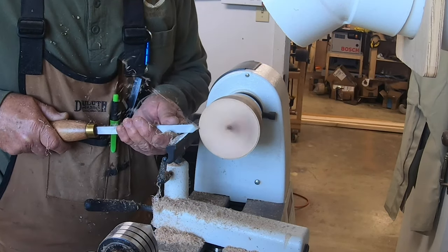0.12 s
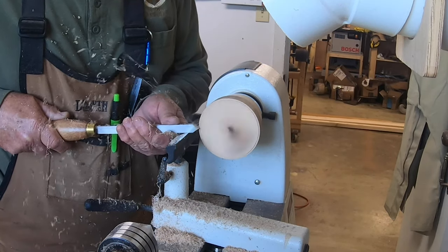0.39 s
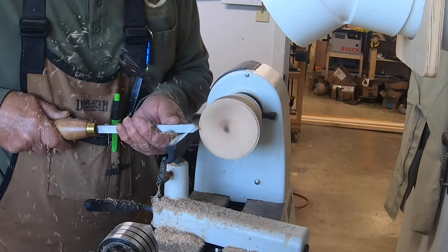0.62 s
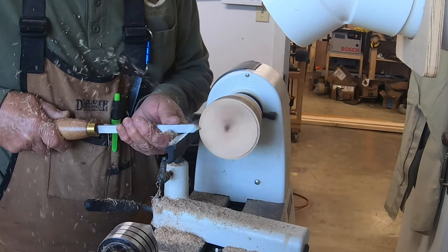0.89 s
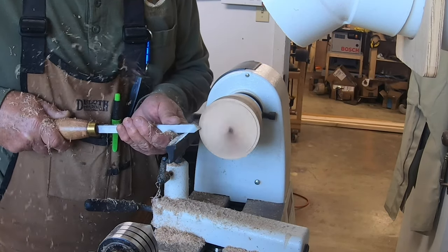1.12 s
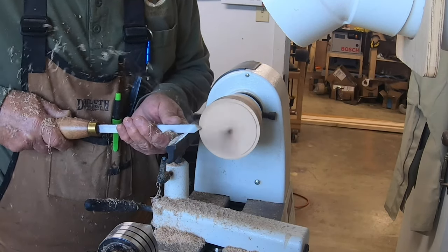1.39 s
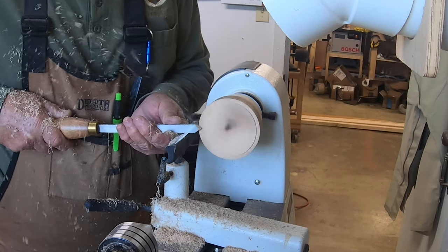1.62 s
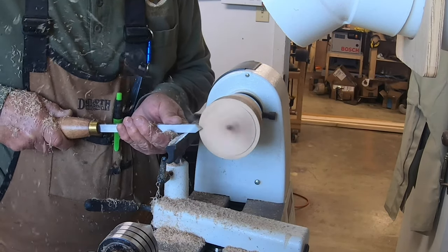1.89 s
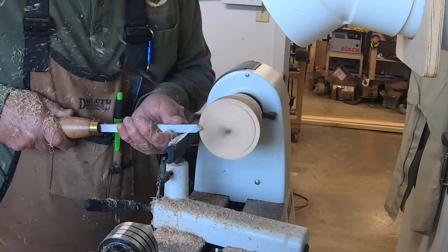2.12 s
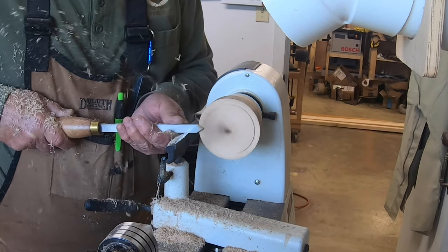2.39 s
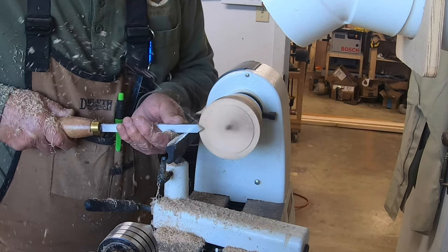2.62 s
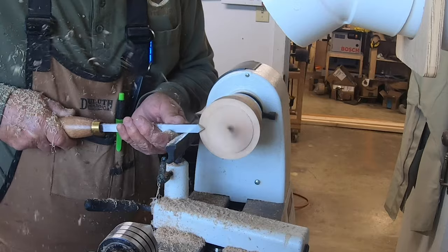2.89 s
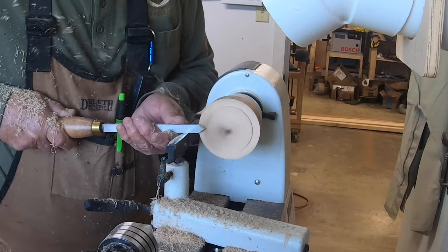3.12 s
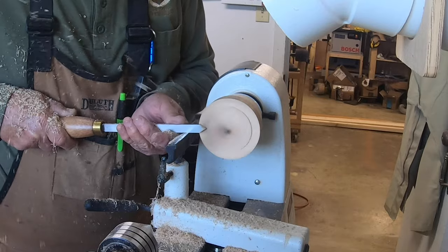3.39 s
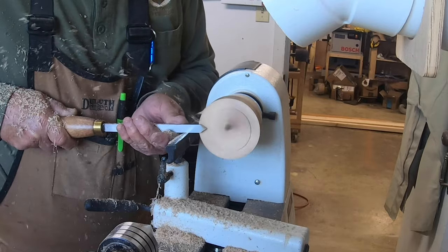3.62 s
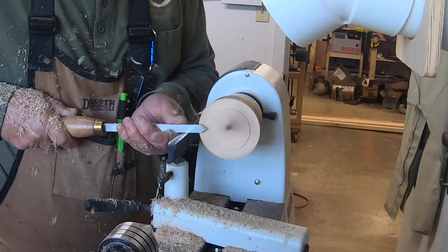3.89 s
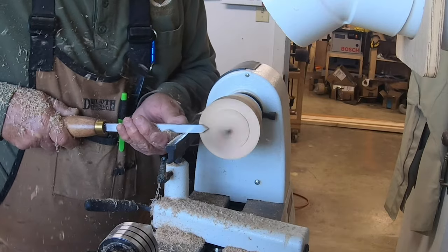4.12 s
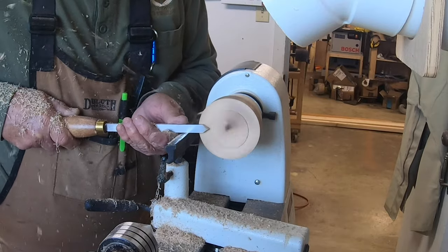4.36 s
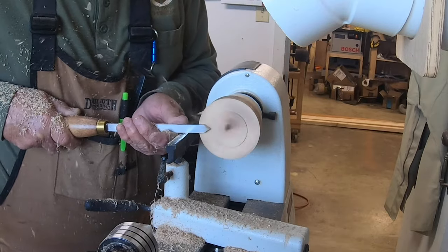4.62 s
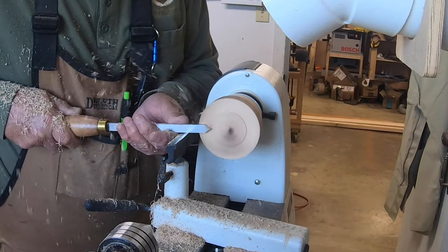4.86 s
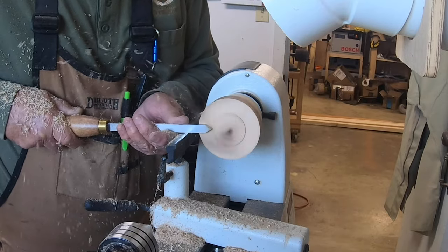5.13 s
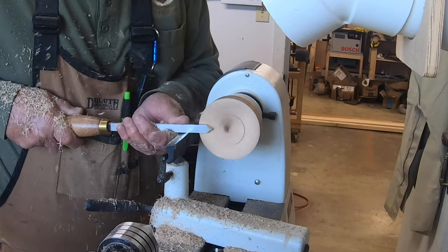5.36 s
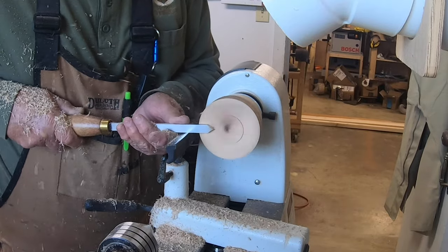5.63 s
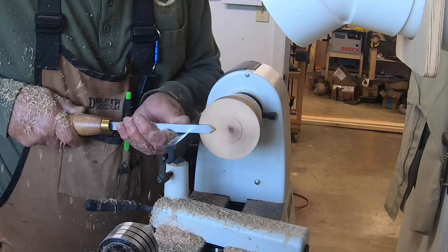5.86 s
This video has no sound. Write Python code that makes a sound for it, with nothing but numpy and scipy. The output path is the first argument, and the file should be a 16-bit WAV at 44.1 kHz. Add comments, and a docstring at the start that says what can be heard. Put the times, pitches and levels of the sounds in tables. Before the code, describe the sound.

From 0 s a wood lathe is running and a hand-held steel tool is already cutting; the sound never stops. The main layer is a dry, bright scraping hiss of tearing fibres, strong in the treble, with little bass. It has a fine, fast buzz because the edge meets the same ridges about a hundred times a second. Within it, thin whistling and whining tones swell in, tremble and fade, mostly between roughly 1.5 and 7 kHz, overlapping irregularly. The pressure firms up within the first half second, then stays nearly level with small patchy flutters until about 4.5 s. From then to 6 s the cut bites deeper: the hiss is louder and rougher, and stronger singing tones around 1.6 to 2 kHz and up to about 10 kHz stand out. A faint motor hum and shop air lie far beneath, dropping slightly after 5 s. Close, dry, wide stereo; it ends mid-cut.

```python
"""Wood turning on a lathe

A tool shears a spinning wooden blank, ever harder, in front of two microphone ports.
Each turn the edge meets nearly the same ridges again, so the scrape repeats at spindle speed:
a comb of spindle orders up to the treble, some singing for a while, in the fresh hiss of torn fibres.
The lathe drive hums below in the shop air; both drop in level late on, as if a recorder's gain went down.
Both ports hear every order at their own level and phase."""
import sys
import numpy as np
from scipy import signal
from scipy.fft import rfft, irfft, next_fast_len
from scipy.io import wavfile
from scipy.ndimage import uniform_filter1d, map_coordinates

SR = 44100
rng = np.random.default_rng(int(sys.argv[2]) if len(sys.argv) > 2 else 0)


def generate_wav(sig):
    """Save sig (samples, or channels by samples) to the path in sys.argv[1] as 16-bit PCM at SR."""
    pcm = np.round(np.clip(np.atleast_2d(sig).T, -1, 1) * 32767).astype(np.int16)
    wavfile.write(sys.argv[1], SR, pcm)


def boost(x):
    """Linear amplitude factor 10**(x/20) for a level x in decibels (scalar or array-like)."""
    u = np.asarray(x, float) / 20
    return 10 ** u


N = 264600  # samples: 6 s
ANGLES = 1024  # points around the rim

# spindle speed under load: time_s, turns_per_s
SPINDLE = [(0.0, 100.5), (0.16, 99.85), (0.38, 101.0), (0.46, 100.45), (0.72, 100.2), (0.87, 100.7),
           (0.93, 101.3), (1.06, 100.35), (1.16, 101.2), (1.28, 100.45), (1.44, 101.25), (1.53, 100.45),
           (1.95, 100.55), (2.6, 101.2), (2.79, 100.0), (3.0, 101.1), (3.58, 101.25), (3.75, 100.75),
           (3.85, 101.3), (4.05, 100.5), (4.32, 100.65), (4.63, 101.4), (4.82, 100.75), (5.75, 101.15),
           (6.0, 100.9)]
# centres of the four registers, blank, tool shank, edge and fibre sizzle: centre_hz
REGISTER_HZ = [1500, 3500, 7500, 13500]
# orders that lock in and sing: start_s, end_s, order, relative_level_db
SING = [(0.05, 2.3, 16, -44.8), (0.05, 0.35, 33, -45), (0.42, 0.85, 33, -41.8), (0.62, 1.35, 59, -45.5),
        (1.47, 2.3, 33, -45), (0.9, 1.7, 27, -48.5), (0.9, 1.6, 29, -48.5), (3.0, 3.55, 16, -45.5),
        (0.12, 0.7, 25, -47), (0.4, 1.7, 28, -46), (0.2, 2.22, 55, -48.5), (1.62, 2.02, 87, -46.4),
        (1.8, 4.05, 67, -46.7), (2.72, 3.07, 26, -44.3), (2.75, 3.05, 33, -46.5), (3.7, 4.45, 33, -47.5),
        (2.92, 3.22, 17, -45.2), (2.92, 4.05, 15, -43), (3.1, 3.5, 13, -46.2), (3.3, 3.8, 59, -46),
        (3.4, 3.82, 55, -46.6), (3.85, 4.47, 16, -43.4), (3.97, 4.37, 26, -44.5), (4.15, 4.6, 21, -44.8),
        (3.95, 4.35, 39, -47), (4.1, 5.45, 23, -49.5), (4.1, 5.4, 9, -62.5), (4.47, 4.8, 6, -59.2),
        (4.87, 5.3, 67, -43.1), (4.9, 6, 12, -46), (5.02, 5.42, 21, -40), (4.95, 5.9, 99, -42.5),
        (5.35, 5.9, 103, -41.5), (5.05, 6, 10, -46), (5.17, 5.92, 16, -41.2), (5.52, 6.0, 67, -43.2),
        (5.77, 6.0, 15, -40.1)]
# wood surface: frequency_hz, memory_turns, fresh_hiss_db, phase_spread_between_ports_rad,
# unshared_part_0_to_1, renewed_part_0_to_1
SURFACE = [(1120, 8, -9, 0.067, 0.28, 0.48), (2380, 6.7, -5.5, 1.4, 0.69, 0.59),
           (5030, 5.7, -6.5, 1.84, 0.44, 0.67), (8400, 3.17, -9, 0.21, 0.5, 0.79),
           (14000, 2.25, -6.5, 1.2, 0.26, 0.66)]
# orders that stand out of the comb: order, relative_level_db, left_over_right_db
ODD = [(6, -9, 0.3), (13, 2, 3), (15, 2, -7), (16, 2, 4.4), (20, -3.4, -3), (21, 2, -5), (22, -7, -1.6),
       (24, -5.6, -4.6), (26, 2, -10), (33, 4, -1.6), (55, 4, -2)]

ORDER_HZ = np.arange(ANGLES // 4) * SPINDLE[-1][1]  # each order at the final spindle speed


def cut(turns, port):
    """Repeating ridges and fresh hiss ring the tool; each register follows the hand's pressure."""
    # the hand on the tool: time_s, pressure_db, extra_level_db (felt fully by the edge register)
    hand = [(0.0, -2.5, 1.5), (0.13, -2.5, -1.5), (0.52, 2, -1), (2.5, 1.5, 1.5), (4.68, 6, 1), (5.2, 7, 3),
            (5.85, 9, 4), (6.0, 9.5, 3)]
    # blank, tool shank, edge, fibre sizzle: level_at_pressure_0_db, db_per_pressure_db, share_of_extra_level
    register_levels = [(-42.5, 0.3876, 0.061), (-40.5, 0.35, 0.019), (-37, 0.2974, 1), (-39.5, 1.38, 0.067)]
    # the bite is harder twice a turn, where the end grain comes round
    grain_db = 1.25 * np.cos(4 * np.pi * turns) + 0.64 * np.cos(2 * np.pi * turns)
    bite = boost(grain_db) * (ridges(turns, port) + hiss())
    scrape = patchy(filtered(bite, tool_resonance), patchy_db=1.95)
    pressure_db, extra_db = curves(hand)
    out = 0
    for only_this, (level_db, grows, share) in zip(np.eye(4), register_levels):
        weights = np.c_[REGISTER_HZ, only_this]  # crossfades into the neighbouring registers
        band = filtered(scrape, lambda hz: along(weights, hz)[0] * (hz > 300))
        gain_db = level_db + grows * pressure_db + share * extra_db + 0.043 * wobble(10)
        out = out + boost(gain_db) * band / np.std(band.mean(0))
    return out


def ridges(turns, port):
    """A map of the surface, turn by angle, that each pass renews a little; the edge reads it along a spiral."""
    # spindle orders: frequency_hz, relative_level_db
    comb = [(850, -42), (920, -22), (1000, -4), (1250, -0.1), (1850, 0.5), (2050, -2.5), (2700, 3),
            (3100, -0.5), (3600, -0.5)]
    top_order = 160
    rows, order = int(turns[-1]) + 2, np.arange(ANGLES // 4)
    memory, _, _, own, renewed = along(SURFACE, ORDER_HZ)

    # random ridges that fade from turn to turn: one set shared, one for each port
    draw = rng.standard_normal((2, 3, rows, len(order)))
    keep = np.exp(-1 / np.clip(memory, .3, 99))
    delay_one_turn = np.exp(-2j * np.pi * np.fft.fftfreq(rows))[:, None]
    fading = np.sqrt(1 - keep ** 2) / (1 - keep * delay_one_turn)
    common, *apart = np.fft.ifft(np.fft.fft(draw[0] + 1j * draw[1], axis=1) * fading, axis=1)

    # deep ridges outlast many passes; neighbouring orders share a spot on the rim, so they knock once a turn
    spot = np.cumsum(2 * unit(uniform_filter1d(rng.standard_normal(len(order)), size=4)))
    creep = unit(uniform_filter1d(rng.standard_normal(common.shape), size=3, axis=1))
    lasting = np.sqrt(2) * np.exp(1j * (spot + np.cumsum(creep, 0) * .5 / np.sqrt(memory)))

    level_db = np.where(order < top_order, along(comb, ORDER_HZ)[0], -120.)
    for k, db, _ in ODD:
        level_db[k] = db
    # every order waxes and wanes over a second or so as the edge moves on
    drift = uniform_filter1d(rng.standard_normal(common.shape), size=40, axis=0)
    drift = uniform_filter1d(drift, size=40, axis=0)
    wander_db = 4.2 * renewed * unit(drift)

    wear = np.linspace(.7, 1, rows)[:, None]  # a deeper cut renews more of the surface
    shared = pair(lasting, common, renewed * wear)
    heard = pair(shared, np.array(apart), own * wear)
    heard = heard * boost(level_db + wander_db) * port[:, None]
    row_s = np.interp(np.arange(rows), turns, np.arange(N) / SR)
    for start, end, k, _ in SING:  # a singing order takes over from its random ridges
        heard[:, :, k] *= 1 - swell(row_s, start, end)

    surface = irfft(heard, ANGLES)
    spiral = [turns, turns % 1 * ANGLES]
    return unit(np.array([map_coordinates(s, spiral, mode="grid-wrap") for s in surface]))


def hiss():
    """Fibres tear anew on each pass, in uneven spurts, and more as the cut deepens."""
    # colour of fresh tearing: frequency_hz, relative_level_db
    tear_colour = [(500, -18), (900, -16.5), (1500, 7.5), (2200, 0.5), (4500, 2)]
    # bands where the tearing is quieter: centre_hz, width_hz, depth_0_to_1
    dips = [(2350, 66, 0.3), (3160, 78, 0.4)]

    def port_phase(hz):
        return np.exp(1j * np.outer([1, -1], along(SURFACE, hz)[2]) * 0.11)

    def colour(hz):
        gain = boost(along(tear_colour, hz)[0] + along(SURFACE, hz)[1])
        for centre, width, depth in dips:
            gain = gain * (1 - np.clip(depth, 0, 1) * np.exp(-((hz - centre) / width) ** 2))
        return gain

    noise = rng.standard_normal((3, N))
    tear = unit(pair(filtered(noise[:1], port_phase), noise[1:], 0.32))
    spurts = boost(1.2 * wobble(45) + np.linspace(-3.5, 2.5, N))
    return filtered(spurts * tear, colour)


def tool_resonance(hz):
    """Gain of the tool and rest resonances over a flat base, added as power."""
    # resonances: centre_hz, width_hz, level_over_base_db
    modes = [(5860, 99, 4.5), (6804, 550, 6.5), (9104, 880, 5.5), (10250, 890, 1), (15240, 830, 6.5)]
    return np.sqrt(1 + sum(boost(db) ** 2 / (1 + (2 * (hz - c) / w) ** 4) for c, w, db in modes))


def patchy(x, patchy_db):
    """Wood density varies: random gain patches, stronger in the treble, and a sliding bright rush."""
    # the rush, sliding down late on as the edge moves on: time_s, centre_hz, gain_at_centre_db
    rush = [(0, 13300, 5), (3.5, 14000, 10), (4.5, 14000, 8.5), (5.0, 13100, 11.5), (5.5, 12600, 7.5),
            (6, 11500, 3)]
    hz, t, z = signal.stft(x, SR, nperseg=512)
    field = uniform_filter1d(rng.standard_normal(z.shape[1:]), size=6, axis=0)
    field = uniform_filter1d(field, size=12, axis=1)
    s, centre, db = np.transpose(rush)
    away = (hz[:, None] - np.interp(t, s, centre)) / 1200
    rush_db = np.interp(t, s, db) * np.exp(-away ** 2)
    treble = np.clip(hz / 5000, 0, 1)[:, None]
    gain = boost(patchy_db * treble * unit(field) + rush_db)
    return signal.istft(z * gain, SR, nperseg=512)[1][:, :N]


def singing(turns, port):
    """Locked orders are nearly clean tones that swell in, tremble and fade, sharing the rim's judder."""
    t, out = np.arange(N) / SR, np.zeros((2, N))
    tremble = [wobble(9), wobble(15), wobble(22), wobble(30)]
    rim = turns + 0.0039 * wobble(25)
    # orders 13 to 19 get rougher as the cut deepens
    chatter_db = 4 * (t / t[-1]) ** 2 * np.array([wobble(45), wobble(60)])
    for i, (start, end, k, db) in enumerate(SING):
        now = slice(max(0, round((start - .1) * SR)), round((end + .1) * SR))
        phase = 2 * np.pi * k * rim[now] + 0.55 * tremble[i % 4][now]
        level_db = db + 4.0 + 2.0 * tremble[(i + 1) % 4][now]
        level_db = level_db + chatter_db[i % 2][now] * (12 < k < 20)
        tone = np.imag(np.exp(1j * phase) * port[:, k, None])
        out[:, now] += boost(level_db) * swell(t[now], start, end) * tone
    return out


def swell(t, start, end):
    """0 to 1 and back, with soft edges 0.2 s long."""
    inside = np.clip(np.minimum(t - start, end - t) / .2 + .5, 0, 1)
    return np.sin(np.pi / 2 * inside) ** 2


def spindle():
    """Turns made so far: the speed under load plus a small random flutter, summed over time."""
    return np.cumsum(curves(SPINDLE)[0] + 0.1 * wobble(9)) / SR


def ports():
    """Each order reaches the two ports with its own level and phase: complex gains, left and right."""
    # lean of the orders to one side: frequency_hz, left_over_right_db
    lean = [(1000, 5.5), (1400, -9), (1800, -8.5), (2200, 1), (2700, -6), (3100, -1.5), (4000, -2.1)]
    spread = along(SURFACE, ORDER_HZ)[2]
    scatter_db = 3.5 * np.clip(ORDER_HZ / REGISTER_HZ[1], 0, 1)
    pan_db = rng.normal(along(lean, ORDER_HZ)[0], scatter_db)
    for k, _, side_db in ODD:
        pan_db[k] = side_db
    half = (pan_db * np.log(10) / 20 + 1j * spread * rng.standard_normal(len(spread))) / 2
    gains = np.exp([half, -half])
    return gains / np.clip(abs(gains.mean(0)), .7, 9)  # level of the mono sum held


def lathe():
    """Slightly unsteady drive tones over shop air, nearly alike at both ports; the deepest air is lumpy."""
    # motor and belt tones: pitch_hz, relative_level_db
    drive = [(100, -84.5), (154.3, -73), (173.6, -73.5), (260.2, -70), (360, -71), (433.8, -69),
             (520.8, -73), (720, -71.5), (781, -69.5)]
    # colour of shop air and motor fan: frequency_hz, relative_level_db
    shop = [(15, -60), (25, -20), (160, -14.5), (265, -7), (308, -8.5), (558, 0.5), (602, -10), (669, -1.5),
            (950, 0.5), (1240, 3), (2090, -120)]
    # drive hum and shop air drop in level, as if the recorder turned its gain down:
    # time_s, level_db (read against the first row)
    background_level = [(0.0, -59.5), (5.2, -62.5), (6.0, -65.5)]
    t, noise = np.arange(N) / SR, rng.standard_normal((6, N))
    shake_db = 2.4 * wobble(6)  # the bed shakes: felt by the deep air and the lowest tones
    tones = 0
    for hz, db in drive:
        size = boost(db + 5.0 + 1.9 * wobble(9) + shake_db * (hz < 190))
        phase = 2 * np.pi * hz * t + 0.95 * wobble(5) + [[.2], [-.2]]
        tones = tones + size * np.sin(phase)
    air = pair(noise[0], noise[1:3], 0.45)
    air = unit(filtered(air, lambda hz: boost(along(shop, hz)[0]) * (hz > 190)))
    lumps = boost(1.2 * shake_db) * pair(noise[3], noise[4:], .65)
    deep = unit(filtered(lumps, lambda hz: boost(along(shop, hz)[0]) * (hz <= 190)))
    drop_gain = boost(curves(background_level)[0] - background_level[0][1])
    mix = tones + boost(-54.5 + 0.94 * wobble(5.21)) * air + boost(-72.0) * drop_gain ** 1.1 * deep
    return drop_gain * mix * boost([[-.3], [.3]])


def unit(x):
    """Scaled to rms 1."""
    return x / np.sqrt(np.mean(np.abs(x) ** 2) + 1e-20)


def along(points, hz):
    """Each column of (Hz, value, ..) rows read on a log axis."""
    f, *cols = np.transpose(points)
    return [np.interp(np.log(hz + 1), np.log(f + 1), c) for c in cols]


def curves(rows):
    """One value per sample for each column after the time."""
    s, *cols = np.transpose(rows)
    return [np.interp(np.arange(N) / SR, s, c) for c in cols]


def wobble(rate):
    """A smooth random curve, rate knots a second (60 at most)."""
    return map_coordinates(rng.standard_normal(400), [np.arange(N) * min(rate, 60) / SR])


def filtered(x, response):
    """x times a response of frequency."""
    m = next_fast_len(N + 8192)
    return irfft(rfft(x, m) * response(np.fft.rfftfreq(m, 1 / SR)), m)[..., :N]


def pair(common, own, share):
    """A common part plus a share of its own, blended at equal power."""
    share = np.clip(share, 0, 1)
    return np.sqrt(1 - share ** 2) * common + share * own


def scene():
    """Cut, singing orders and lathe together at the two ports."""
    turns, port = spindle(), ports()
    return cut(turns, port) + singing(turns, port) + lathe()


def band_limit(x):
    """A steep low-pass at the top of the band."""
    return signal.sosfilt(signal.butter(12, 16360, fs=SR, output="sos"), x)


def record(dry):
    """The camera's band limit: a steep fall just below 15.8 kHz."""
    mix = filtered(dry, lambda hz: np.clip((15800 - hz) / 80, .002, 1))
    return band_limit(mix)


dry = scene()
out = record(dry)
generate_wav(out)
```